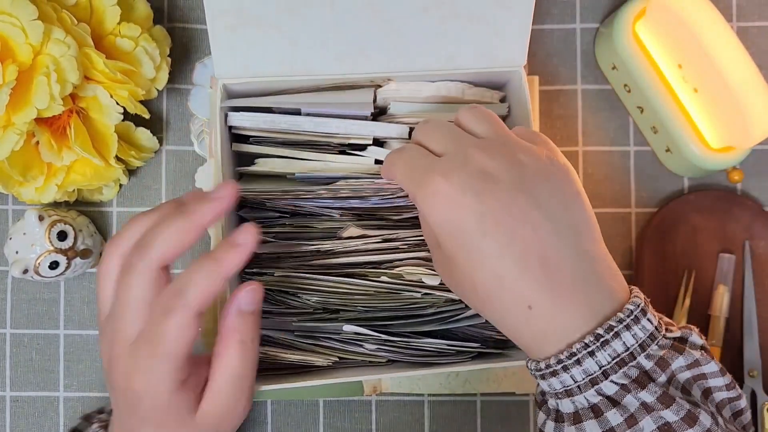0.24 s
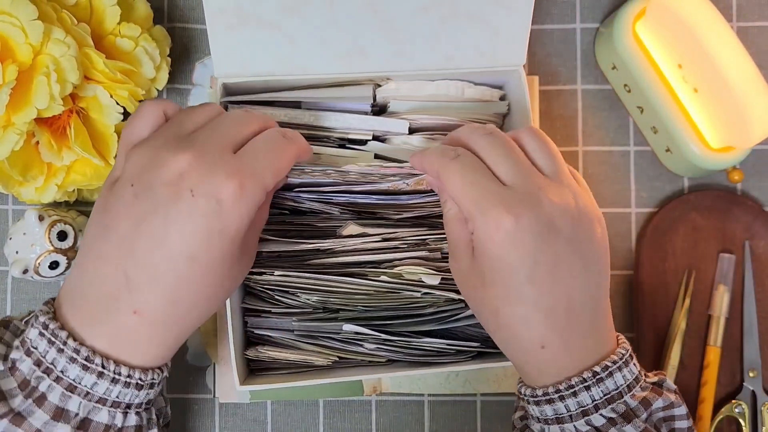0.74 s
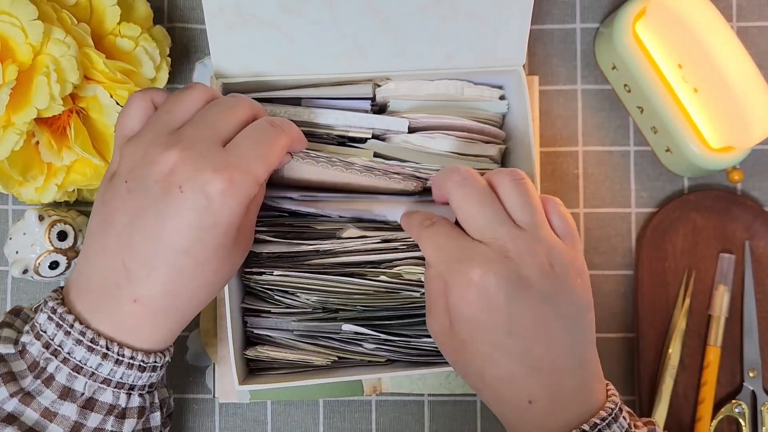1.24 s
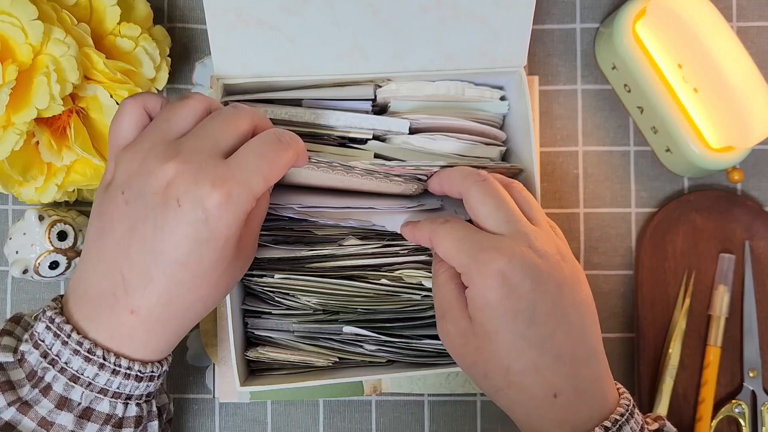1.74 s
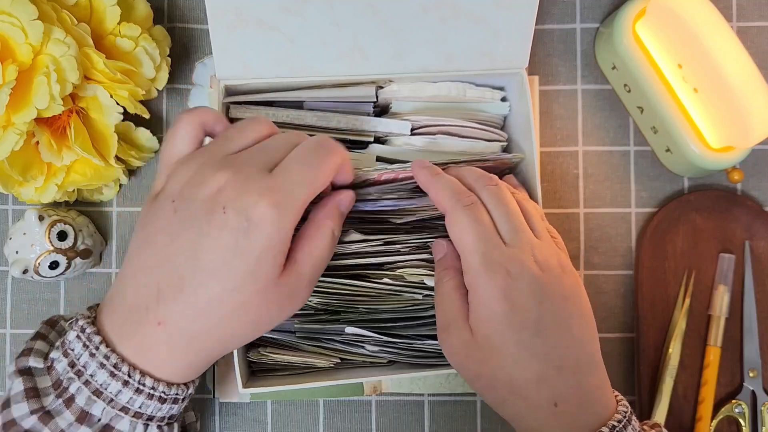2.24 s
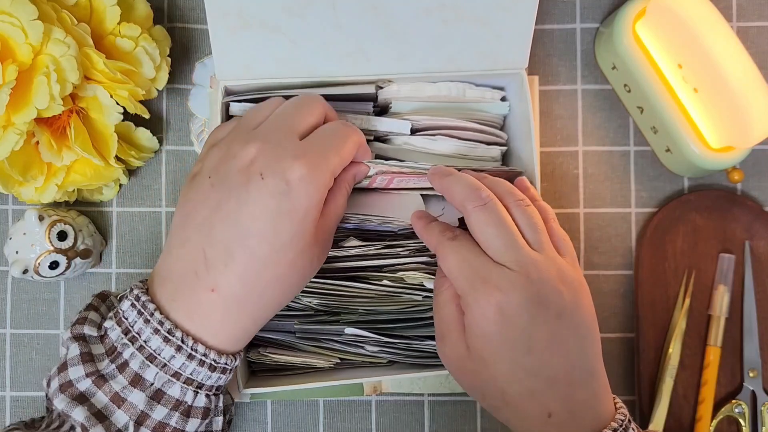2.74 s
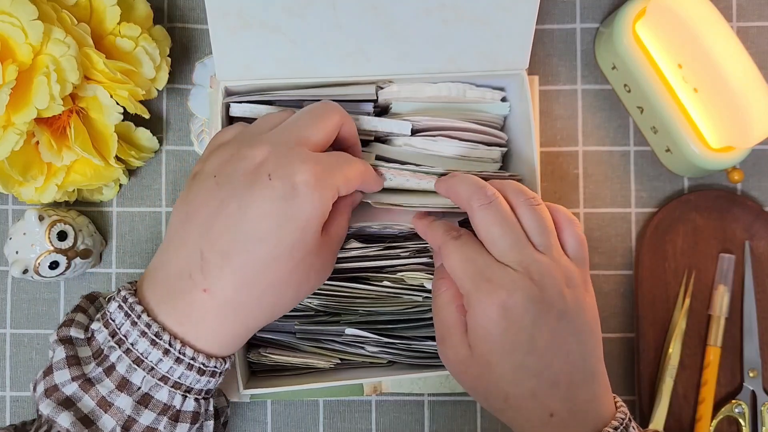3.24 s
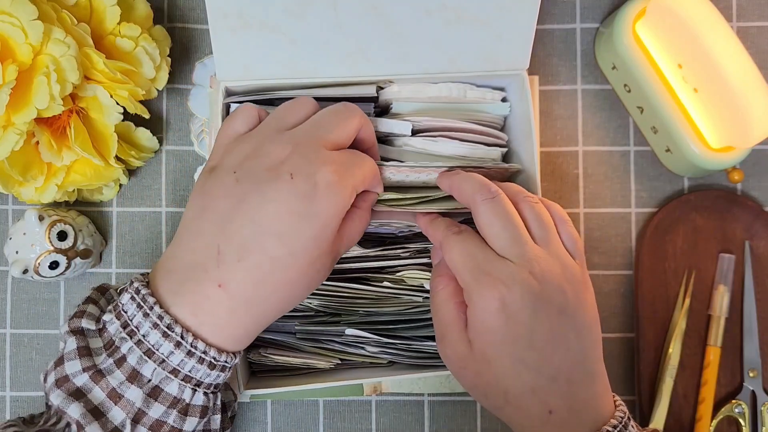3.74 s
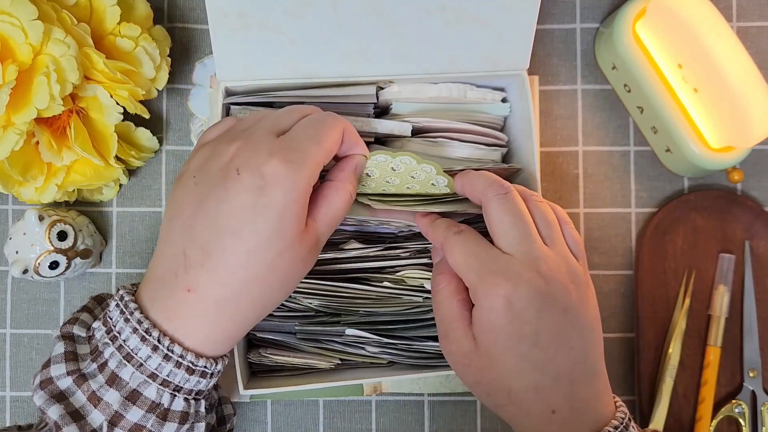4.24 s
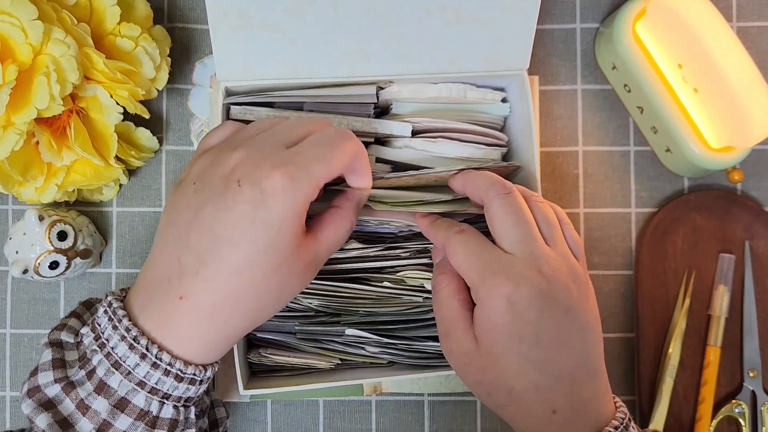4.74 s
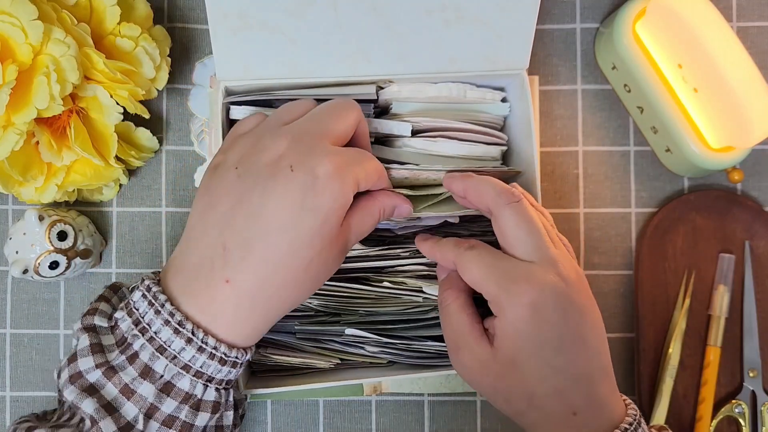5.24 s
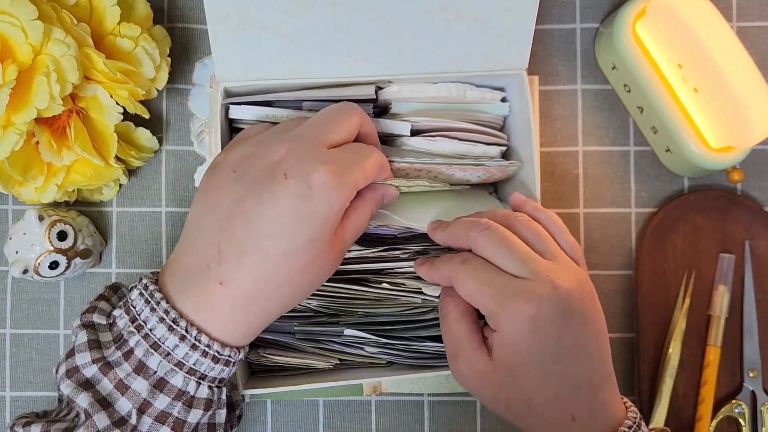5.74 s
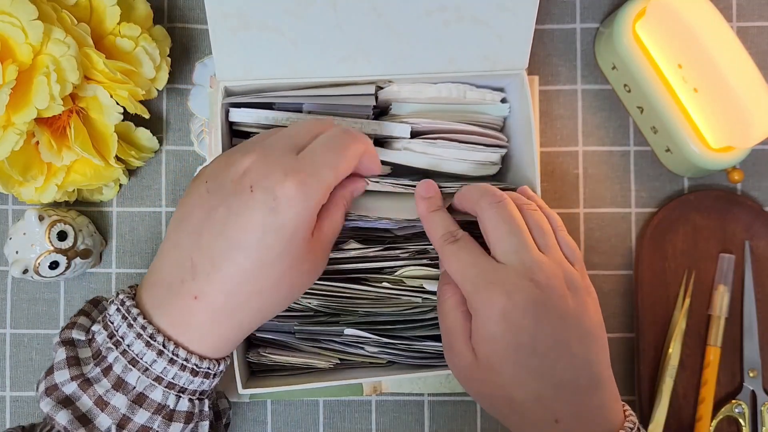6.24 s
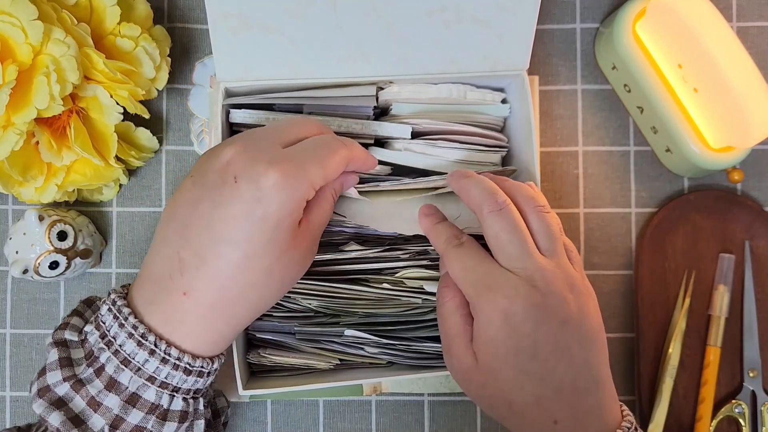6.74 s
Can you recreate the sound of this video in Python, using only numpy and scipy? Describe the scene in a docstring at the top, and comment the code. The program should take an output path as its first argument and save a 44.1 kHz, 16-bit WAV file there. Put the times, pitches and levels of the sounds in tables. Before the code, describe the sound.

Very close to the microphone, fingers work through paper scraps packed upright in a cardboard box on a desk. Soft rubbing gives way to crisp flicks, small scratchy ticks and short swishes, busiest in the first three seconds. The middle is quieter, with light rustling; then firmer shuffling returns with dull box thumps and sharp flicks before easing off. A small, hushed room with faint hum lies behind.

```python
"""Leafing through paper in a box

Close to the microphone, fingers leaf through paper scraps packed upright in a cardboard box on a desk.
Grainy friction noise makes the rubbing and short swishes; damped sines and noise bursts make the freed edges.
Resonators ring the box and a stiff edge; creases tick, bent sheets boom, and the desk rumbles as filtered noise.
Behind: hushed noise of a small room, a faint hum and a wavering low sine drone with two main swells."""
import sys
import numpy as np
from scipy import signal
from scipy.fft import rfft, irfft, next_fast_len
from scipy.io import wavfile
from scipy.ndimage import uniform_filter1d

SR = 44100
rng = np.random.default_rng(int(sys.argv[2]) if len(sys.argv) > 2 else 0)


def to_wav(sig):
    """Store sig (one row per channel, or 1-D mono) as 16-bit WAV at the path in sys.argv[1].

    Samples outside -1..1 are clipped; the rate is SR.
    """
    pcm = np.clip(np.atleast_2d(sig), -1, 1) * 32767
    pcm = np.round(pcm).astype(np.int16)
    wavfile.write(sys.argv[1], SR, pcm.T)  # frames by channels


N = 309141
TIME = np.arange(N) / SR

# Sheet edges snapping free: [t/s, flex level/dB, flex f/Hz, crack level/dB]
SNAPS = [(0.1353, -49.5, 1150, -52), (0.2136, -39, 1030, -63), (.2818, -41, 1470, -43),
         (0.4164, -48, 935, -45), (0.4855, -42.5, 860, -47), (0.5408, -26.5, 1150, -33.5),
         (0.6306, -41, 930, -44), (0.6613, -41.5, 690, -44), (.6971, -40, 691, -42), (.843, -41, 1150, -46),
         (.977, -38.5, 980, -41), (.9936, -38, 1560, -37.5), (1.0159, -33.5, 1050, -32),
         (1.0187, -30, 1000, -34.5), (1.3017, -32.5, 1380, -30), (1.3245, -19.5, 970, -20),
         (1.3375, -45, 910, -38.5), (1.344, -26, 1050, -29.5), (1.3914, -32, 1070, -33),
         (1.5085, -46.5, 680, -55), (1.954, -52, 1410, -47), (2.0407, -27.5, 1380, -30),
         (2.0629, -26, 820, -27), (2.066, -29, 1490, -33), (2.0944, -29.5, 1220, -34),
         (2.1394, -40.5, 1100, -42), (2.275, -39, 1050, -44.5), (2.3843, -19, 1080, -28),
         (2.441, -48.5, 1220, -53.5), (2.4863, -45.5, 1190, -47.5), (2.5313, -32, 1350, -31),
         (2.6749, -38, 1060, -32), (2.7909, -32.5, 990, -38.5), (2.8891, -42, 1080, -39.5),
         (3.2701, -46, 1570, -44), (3.2836, -27.5, 1140, -28), (3.7377, -49.5, 1050, -66),
         (4.8999, -38.5, 900, -47.5), (4.9197, -35, 1930, -36.5), (5.2856, -39.5, 780, -38),
         (5.7729, -36.5, 875, -29.5), (5.7827, -27.5, 890, -30), (6.1775, -38, 1100, -42),
         (6.1942, -44.5, 1095, -51.5), (6.3136, -34, 790, -36), (6.325, -39, 965, -41.5),
         (6.4265, -47.5, 1560, -41), (6.4592, -36.5, 1140, -39), (6.4796, -47.5, 1210, -44.5),
         (6.8779, -44.5, 2420, -42), (6.908, -44.5, 1178, -39.5)]
# Resonances of the filled box: [f/Hz, width/Hz, level/dB]
BOX = [(565, 55, -3), (645, 70, 0), (735, 90, -5), (1125, 120, -14)]
# Spectrum of sliding paper: [f/Hz, relative density level/dB]
PAPER = [(60, -37.5), (130, -9.5), (230, -10.5), (400, -6), (620, 0.5), (1000, 1), (1400, -4.5), (2600, -5),
         (3300, -5), (5500, -13), (7500, -18), (10400, -21.5), (12300, -29.5), (15500, -31)]
# Spectrum of the bright fibre hiss: [f/Hz, relative density level/dB]
HISS = [(3000, -16), (5500, -4), (7800, 4.5), (10000, 2), (12500, -6), (14500, -1), (16000, -10)]


def undb(db):
    """Decibels to gain."""
    return 10 ** (np.asarray(db) / 20)


def unit(x):
    """Scale to rms 1."""
    return x / np.sqrt(np.mean(x ** 2) + 1e-20)


def add(out, s, x):
    """Mix x into out from time s on."""
    i = max(int(s * SR), 0)
    out[i:i + len(x)] += x[:max(len(out) - i, 0)]


def colour(x, points, tilt_db=0, bass_db=0, ripple_db=0, band=(0, SR)):
    """Shape white x by a spectrum, treble tilt, bass shelf and random ripple; rms 1 stays 1 within band."""
    size = next_fast_len(len(x) + 1024)
    hz = np.maximum(np.fft.rfftfreq(size, 1 / SR), 1)
    knots, db = np.transpose(points)
    db = np.interp(np.log(hz), np.log(knots), db)
    db += tilt_db * np.log2(np.clip(hz / 1500, 1, 9))  # dB per octave above 1500 Hz
    db += bass_db / (1 + (hz / 430) ** 4)
    db += ripple_db * np.interp(hz, np.geomspace(700, 16000, 28), rng.standard_normal(28))
    gain = undb(db)
    in_band = (hz >= band[0]) * (hz < band[1])
    gain = gain / np.sqrt(np.mean(gain ** 2 * in_band))
    return irfft(rfft(x, size) * gain, size)[:len(x)]


def walk(rate):
    """Random wander of rms 1: straight lines between chance values, rate of them a second."""
    knots = rng.standard_normal(int(N / SR * rate) + 2)
    return unit(np.interp(TIME * rate, np.arange(len(knots)), knots))


def ring(x, modes):
    """Pass x through resonances of [f/Hz, width/Hz, level/dB] side by side."""
    return sum(undb(db) * signal.lfilter(*signal.iirpeak(hz, hz / width, SR), x) for hz, width, db in modes)


def friction(rate, spread_db, share, flutter_db):
    """Fibres catching and letting go: uneven tiny slips (rate per s) over a smooth rush, fluttering with the grip."""
    sizes = undb(spread_db * np.minimum(rng.exponential(size=N), 5))
    slips = (rng.random(N) < rate / SR) * sizes * rng.choice([-1, 1], N)
    share = np.clip(share, 0, 1)  # part of the power that comes from the slips
    grain = np.sqrt(share) * unit(slips) + np.sqrt(1 - share) * rng.standard_normal(N)
    return unit(grain * undb(flutter_db * walk(170)))


def effort_db():
    """How hard the fingers work the stack at every moment."""
    # Working of the stack: [t/s, rubbing level/dB]
    effort_points = [(0.0, -73), (0.11, -70.5), (0.25, -63), (0.49, -61), (0.6, -54.5), (0.78, -63),
                     (1.27, -57), (1.48, -68), (1.79, -65), (2.18, -63.5), (2.36, -62), (2.68, -57),
                     (2.97, -61), (3.18, -59.5), (3.81, -66), (4.04, -69.5), (4.33, -73), (4.76, -72.5),
                     (4.92, -54), (5.11, -59.5), (5.54, -62.5), (5.78, -59.5), (5.9, -55), (6.33, -58.5),
                     (6.5, -62.5), (7.01, -67.5)]
    return np.interp(TIME, *np.transpose(effort_points))


def drags():
    """Pressure of a fingertip dragged over the sheet tops: it settles, holds and lifts."""
    # Drags of the fingertip: [start t/s, length/s, level/dB]
    drag_table = [(0.207, 0.078, -49), (0.598, .2, -57), (0.823, .15, -48), (1.26, .16, -53),
                  (1.498, 0.073, -48), (1.621, 0.11, -54), (1.75, 0.15, -61), (2.367, 0.068, -52),
                  (2.723, .22, -53), (3.041, 0.13, -54.5), (3.264, .11, -54.5), (4.063, 0.12, -46.5),
                  (4.73, .17, -56), (5.03, .11, -51), (5.248, 0.11, -49.5), (5.512, 0.096, -51.5),
                  (5.81, .16, -47.5), (6.039, 0.12, -51.5), (6.221, 0.14, -46), (6.378, 0.14, -51.5),
                  (6.708, .21, -47)]
    attack_s, release_s = 0.018, 0.028
    pressure = np.zeros(N)
    for s, length, db in drag_table:
        settling = (TIME - s) / attack_s
        lifting = (s + length - TIME) / release_s
        pressure += undb(db) * np.clip(np.minimum(settling, lifting), 0, 1)
    return pressure


def handling(rub_db=1, ring_db=-5, drag_db=-4.0, hiss_db=-9.5, grip_db=3, rest_db=-73, uneven_db=2.5):
    """Fingertips and leaning sheets rub and hiss with the effort, silent at rest; drags set the box ringing."""
    # Spectrum of the rubbing: [f/Hz, relative density level/dB]
    rub_spectrum = [(100, -15), (250, -7.5), (400, -14), (540, -0.5), (800, -2.5), (1100, -0.5), (1700, -3),
                    (2500, -7), (3500, -4.5), (6500, -13.5), (7400, -25.5), (15000, -36)]
    above_rest = np.maximum(undb(effort_db()) ** 2 - undb(rest_db) ** 2, 0)
    effort = np.sqrt(above_rest) * undb(uneven_db * walk(13))
    grain = friction(rate=1500, spread_db=3.0, share=0.3, flutter_db=2.5) * undb(1.0 * walk(35))
    # the rubbing passes from sheet to sheet, each with a ripple of its own
    sheets = [colour(np.roll(grain, k * SR), rub_spectrum, ripple_db=2, band=(900, 6000)) for k in range(4)]
    contact = undb(6.0 * np.array([walk(9.8) for _ in sheets]))
    faces = np.sum(contact * sheets, axis=0) / np.linalg.norm(contact, axis=0)
    # the shifting grip damps now one resonance of the box, now another
    hollow = unit(sum(undb(grip_db * walk(14)) * ring(grain, [mode]) for mode in BOX))
    fibres = colour(friction(rate=4000, spread_db=1.0, share=.2, flutter_db=1.5), HISS)
    steady = undb(rub_db) * faces + undb(ring_db) * hollow + undb(hiss_db) * fibres
    return effort * steady + undb(drag_db) * drags() * hollow


def slides(gain_db=0, ripple_db=1.0, sharp=1.49, hiss_db=-19, hiss_per_tilt=1.5):
    """A sheet gathers speed and stops again, in its own colour; edges hiss brightly, broad faces scuff low."""
    # Sheets sliding past each other:
    # [t of top speed/s, rise/s, fall/s, level/dB, treble tilt/(dB per octave), bass level/dB]
    slide_table = [(.11, .06, 0.15, -64, 2.5, -27), (.228, .04, 0.079, -55, 5, -7),
                   (.42, .01, 0.041, -48.5, 0, -7), (.55, 0.029, 0.029, -44.5, 1, 6),
                   (.63, 0.033, 0.028, -42, -4, -14), (.71, 0.022, 0.12, -49, -1.5, 1),
                   (0.989, 0.038, 0.024, -42, -1.5, 2), (1.018, 0.0077, 0.028, -43.5, 5.5, 11),
                   (1.11, 0.037, 0.068, -54, 5, -3.5), (1.304, .028, 0.01, -36, -6, -19.5),
                   (1.342, 0.015, 0.023, -32, -2.5, -9.5), (1.43, 0.011, 0.019, -52.5, 3.5, 5),
                   (2.04, 0.11, 0.042, -45, 0, -14), (2.065, 0.0063, .018, -33, 3, 9),
                   (2.096, 0.014, 0.017, -27.5, -3.5, 2), (2.115, .004, .005, -46, 8.5, 15),
                   (2.127, .009, 0.012, -37, 3.5, 6), (2.14, .013, 0.063, -48, 0, 8),
                   (2.25, 0.0065, 0.042, -36, -3.5, -11), (2.372, .009, 0.016, -53.5, 1, -13),
                   (2.393, 0.011, 0.021, -36, -14, -10), (2.581, 0.023, 0.022, -41, 1.5, -25.5),
                   (2.676, 0.058, 0.03, -43.5, 4, -4), (2.792, 0.021, 0.028, -46, 1.5, -5),
                   (2.892, 0.0088, 0.052, -50.5, -6, 13.5), (2.986, 0.022, 0.032, -51.5, 1.5, -15),
                   (3.52, .05, 0.14, -60, 2, -3), (3.655, .029, 0.036, -69, 8.5, -2),
                   (4.124, 0.15, 0.031, -48, 3, -20), (4.21, 0.026, 0.085, -57.5, -.5, -15),
                   (4.745, 0.048, 0.21, -63.5, 6.5, 22), (4.92, 0.041, .024, -41, 1, 12),
                   (5.085, 0.059, 0.099, -51, -1, 6), (5.29, 0.057, .028, -44.5, -0.4, 8.5),
                   (5.343, 0.02, 0.019, -54, .5, 12), (5.463, 0.018, 0.041, -42.5, 3, 5),
                   (5.774, 0.01, 0.006, -27, 1.5, 14), (5.783, 0.0066, 0.025, -31, 2.5, 8),
                   (5.874, 0.11, 0.056, -43, -0.5, 19.5), (6.05, 0.055, 0.071, -55.5, 0.5, -5),
                   (6.179, .01, 0.025, -40, -15, -8), (6.322, .05, 0.041, -43, -0.5, 8.5),
                   (6.428, 0.0057, 0.024, -42, 1.5, 11), (6.65, 0.027, 0.045, -56.5, -1.8, -18),
                   (6.8, 0.03, .025, -54.5, 1, -4.5), (6.875, 0.057, .033, -45.5, -1.1, -2),
                   (6.908, .01, 0.042, -42.5, -3.5, 5.5)]
    out, grain = np.zeros(N), friction(rate=2500, spread_db=1.0, share=0.43, flutter_db=2.5)
    fibres = colour(rng.standard_normal(N), HISS)
    for s, rise, fall, db, tilt, bass in slide_table:
        span = (TIME >= s - 2 * rise) & (TIME < s + 2 * fall)
        t = TIME[span] - s
        speed = np.exp(-np.abs(1.7 * t / np.where(t < 0, rise, fall)) ** sharp)
        swish = colour(grain[span] * speed, PAPER, tilt, bass, ripple_db, band=(600, 2500))
        hiss = undb(hiss_db + hiss_per_tilt * tilt) * speed * fibres[span]
        add(out, s - 2 * rise, undb(db + gain_db) * (swish + hiss))
    return out


def scrapes(lead_s=0.018, lead_db=-25, tilt_db=1):
    """Around half a lead before it snaps free, each listed edge scrapes briefly over the fingertip."""
    grip = np.zeros(N)
    for s, flex_level, _, crack_level in SNAPS:
        level = undb(max(flex_level, crack_level) + lead_db)
        grip += level * np.exp(-((TIME - s) / lead_s + .5) ** 2 * 4)
    grain = friction(rate=940, spread_db=3.0, share=.4, flutter_db=-2)
    return grip * colour(grain, PAPER, tilt_db)


def flex(t, hz, rise_s, cut_hz=430):
    """A sheet whipping through a few cycles; open on both sides, it radiates little bass."""
    wave = t * np.exp(-t / rise_s) * np.sin(2 * np.pi * hz * t)
    return signal.sosfilt(signal.butter(2, cut_hz, "high", fs=SR, output="sos"), wave)


def snaps(rise_s=0.00061, crack_s=0.00054, after_db=-19, after_s=0.0037, skirt_db=8, flex_db=0, crack_db=0,
          count=20, stray_db=8, stray_hz=1100):
    """A freed edge flexes with a dry crack, then chatters against its neighbours; strays follow the effort."""
    # Spectrum of the crack: [f/Hz, relative density level/dB]
    crack_points = [(200, -34), (450, -19.5), (600, -3), (1500, 5.5), (4000, 0), (9000, -9.5), (15500, -18)]
    centre_hz, octaves_per_db = 2754, 0.29  # the centre rises as the crack outweighs the flex
    out, t = np.zeros(N), np.arange(SR // 20) / SR
    blow = t < .004  # levels are set over the first 4 ms
    knots, crack_spectrum = np.transpose(crack_points)
    burst = np.sqrt(t / crack_s) * np.exp(-t / crack_s / 2)
    chatter = undb(after_db) * np.exp(-t / after_s)
    shape = burst + chatter
    faint = effort_db() + stray_db
    busy = undb(faint) ** 2
    strays = [(TIME[i], faint[i], stray_hz * 2 ** (rng.random() - .5), faint[i] - 4)
              for i in rng.choice(N, count, p=busy / busy.sum())]
    for s, flex_level, flex_hz, crack_level in SNAPS + strays:
        whip = flex(t, flex_hz, rise_s)
        # the spectrum falls away on both sides of the crack's centre
        crack_hz = centre_hz * 2 ** (octaves_per_db * (crack_level - flex_level))
        hz = np.sort(np.append(knots, crack_hz))
        db = np.interp(hz, knots, crack_spectrum) - skirt_db * np.abs(np.log2(hz / crack_hz))
        crack = colour(rng.standard_normal(len(t)) * shape, np.column_stack([hz, db]))
        add(out, s, undb(flex_level + flex_db) * whip / whip[blow].std())
        add(out, s, undb(crack_level + crack_db) * crack / crack[blow].std())
    return out


def crinkles(rubbing, count=1100, centre_hz=3100, spread_octaves=0.7, spread_db=3.0, size_db=-5.5, cycles=0.76):
    """Small creases buckle at random, each at its own pitch, louder where the sheets rub harder."""
    out, t = np.zeros(N), np.arange(SR // 100) / SR
    force = np.sqrt(np.abs(uniform_filter1d(rubbing ** 2, SR // 50)))
    for when, size, pitch in rng.random((count, 3)):
        octaves = spread_octaves * np.sqrt(12) * (pitch - .5)  # sqrt(12) makes the spread a standard deviation
        hz = min(centre_hz * 2 ** octaves, SR / 3)
        tick = t * np.exp(-t * hz / cycles) * np.sin(2 * np.pi * hz * t)
        db = size_db - spread_db * np.log(max(size, .02)) - octaves  # higher creases are weaker
        add(out, when * N / SR, force[int(when * N)] * undb(db) * tick / np.abs(tick).max())
    return out


def scratches(gain_db=0):
    """A fingernail drags or slips on a stiff, glossy edge, which sings thinly."""
    # Scratches and ticks of the nail: [t/s, level/dB, swell/s]
    scratch_table = [(.503, -53, 0.009), (0.5212, -40, 0.00042), (0.536, -47.5, 0.0072),
                     (0.551, -47, 0.0014), (0.567, -39, .0005), (0.5925, -34, 0.00043),
                     (0.657, -44, 0.0011), (.661, -22.5, 0.00038), (0.662, -26, 0.00039),
                     (.692, -54, 0.0054)]
    # Resonances of the stiff edge: [f/Hz, width/Hz, level/dB]
    edge_modes = [(3200, 510, 0.5), (5440, 500, 3), (7700, 340, -12)]
    drag, t = np.zeros(N), np.arange(SR // 8) / SR
    for s, db, swell in scratch_table:
        add(drag, s, undb(db + gain_db) * t / swell * np.exp(1 - t / swell))
    grain = rng.standard_normal(N)
    return ring(grain * drag, edge_modes) / ring(grain, edge_modes).std()


def booms():
    """A bent sheet or the whole pushed stack gives way: a low note that swells and dies within a few cycles."""
    # Booming sheets and stack: [t/s, f/Hz, level/dB, swell/s]
    boom_table = [(0.6602, 540, -50, 0.0052), (.697, 156, -43, 0.0056), (0.86, 166, -45.5, 0.0053),
                  (1.013, 322, -36.5, 0.0044), (1.02, 157, -63, 0.007), (1.326, 501, -33, .003),
                  (2.2465, 628, -28.5, 0.0034), (4.804, 249, -45.5, 0.0054), (4.908, 294, -32.5, 0.0046),
                  (5.767, 71, -50, 0.013), (5.77, 227, -35.5, 0.003), (5.846, 112, -37.5, 0.015),
                  (5.866, 174, -36, 0.0043), (5.882, 330, -43, 0.0049), (5.893, 167, -31, 0.0046),
                  (6.326, 400, -42, .005)]
    out, t = np.zeros(N), np.arange(SR // 4) / SR
    for s, hz, db, swell in boom_table:
        add(out, s, undb(db) * t / swell * np.exp(1 - t / swell) * np.sin(2 * np.pi * hz * t))
    return out


def desk(paper, level_db=-62.5, follow=0.35):
    """The desk rumbles under the hands at its lowest resonance, more as the paper is worked harder."""
    # Lowest resonance of the desk: [f/Hz, width/Hz, level/dB]
    desk_modes = [(71, 30, 0)]
    rumble = unit(ring(ring(rng.standard_normal(N), desk_modes), desk_modes))
    work = uniform_filter1d(np.abs(paper), SR // 6)
    return undb(level_db) * rumble * unit(np.abs(work) ** follow)


def room(x, near_db=-12, near_t60=0.072, tail_db=-19, tail_t60=0.18):
    """One clear bounce off a nearby wall, quick scatter from the things on the desk, and a short room tail."""
    t = np.arange(SR // 2) / SR
    response = np.zeros(len(t))
    for db, t60 in ((near_db, near_t60), (tail_db, tail_t60)):
        scatter = colour(rng.standard_normal(len(t)), [(100, -16.0), (600, -1.0), (1200, -2), (4000, -4.5), (15000, -2)])
        scatter = scatter * undb(-60 * t / t60) * (t > .002)
        response += undb(db) * scatter / np.sqrt(2 * np.sum(scatter ** 2))  # total energy 3 dB below db
    # the wall answers about 8 ms later and keeps back the treble
    add(response, .0079, undb(-10) * np.hanning(9) / 4)
    return x + signal.fftconvolve(x, response)[:N]


def background(drone_db=-1, waver=0.034, hum_db=-71, mains_hz=120, room_tone_db=-63):
    """A wavering low sine drone, a faint mains hum and the noise hush of the room."""
    # Swells of the drone, ahead of the drone_db trim: [t/s, level/dB]
    drone_swells = [(4.3, -71), (4.526, -50), (4.932, -43), (5.418, -64), (5.464, -54), (5.66, -62),
                    (5.788, -39.5), (6.062, -55.5), (6.15, -77.5)]
    # Pitch of the drone, ahead of its waver: [t/s, f/Hz]
    drone_pitch = [(4.5, 65.2), (4.9, 71.3), (5.3, 74.1), (5.8, 71.2), (6.05, 64.5)]
    # Spectrum of the quiet room: [f/Hz, relative density level/dB]
    hush_spectrum = [(20, -17), (35, -4.5), (55, -4), (120, 0.5), (200, -10.5), (300, -14.5), (450, -22),
                     (740, -18), (2000, -30), (3700, -22), (6700, -23.5), (7300, -35), (9500, -31),
                     (15500, -37)]
    hz = np.interp(TIME, *np.transpose(drone_pitch)) * (1 + waver * walk(25))
    drone = unit(np.sin(2 * np.pi * np.cumsum(hz) / SR) * undb(1.3 * walk(17)))
    swell_db = np.interp(TIME, *np.transpose(drone_swells), left=-np.inf, right=-np.inf)
    drone = drone * undb(swell_db + drone_db)
    hum = unit(np.sin(2 * np.pi * mains_hz * TIME) * undb(3.2 * walk(33)))
    hush = colour(rng.standard_normal(N), hush_spectrum)
    return drone + undb(hum_db) * hum + undb(room_tone_db) * hush


def scene():
    """All the paper sounds in their box and room, over the desk and the background."""
    sliding, rubbing = slides(), handling()
    flicks = sliding + scrapes() + snaps() + crinkles(sliding + rubbing)
    # every flick shakes the box as well
    paper = flicks + undb(-7) * ring(flicks, BOX) + rubbing + scratches() + booms()
    return (undb(-1.86) * room(paper) + desk(paper) + background())[None]


def record(dry, top_hz=15800):
    """The recorder drops the deepest rumble and cuts the top."""
    dry = signal.sosfilt(signal.butter(2, 28, "high", fs=SR, output="sos"), dry)
    return signal.sosfilt(signal.ellip(10, .2, 70, top_hz, fs=SR, output="sos"), dry)


dry = scene()
out = record(dry)
to_wav(out)
```